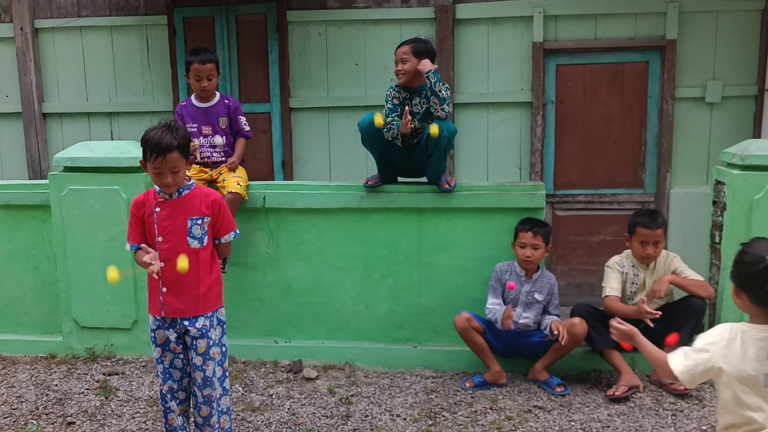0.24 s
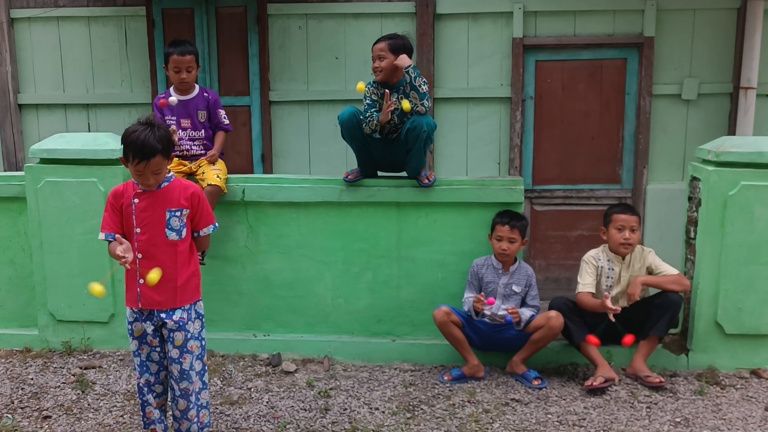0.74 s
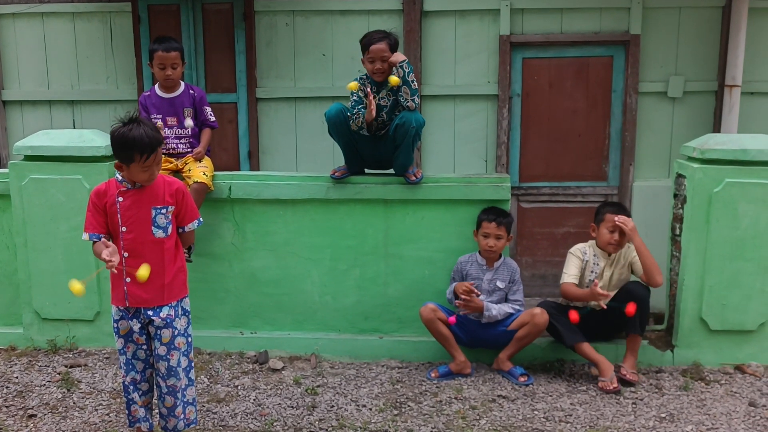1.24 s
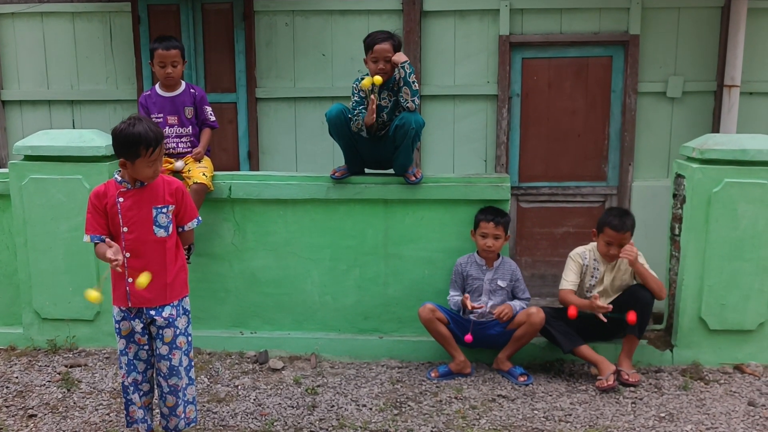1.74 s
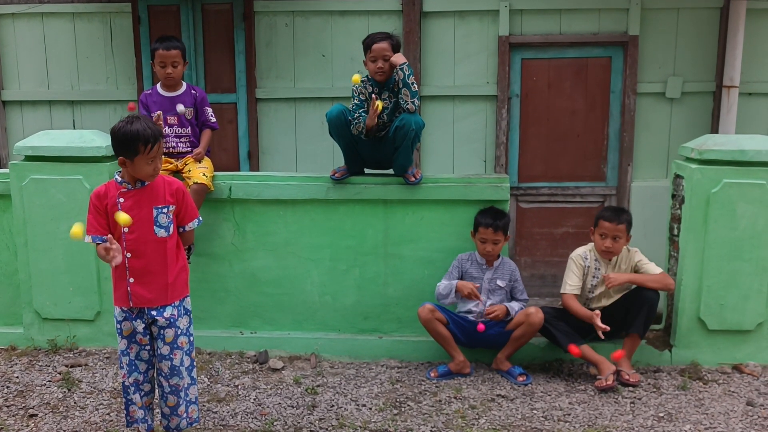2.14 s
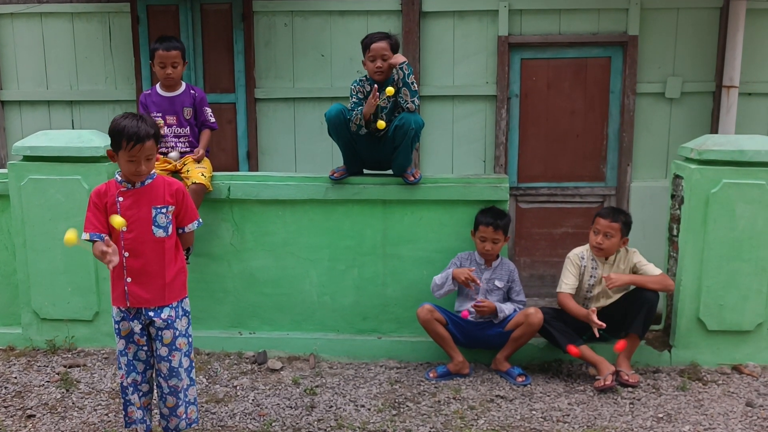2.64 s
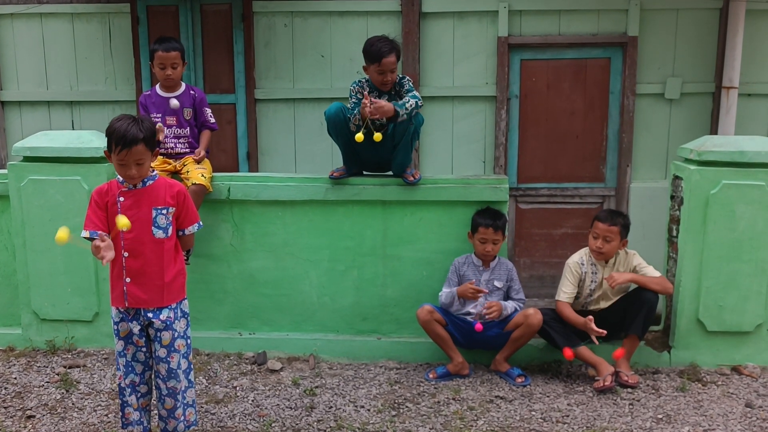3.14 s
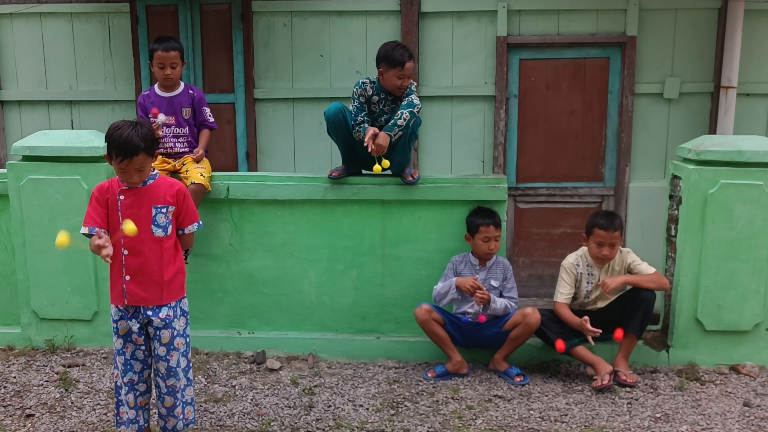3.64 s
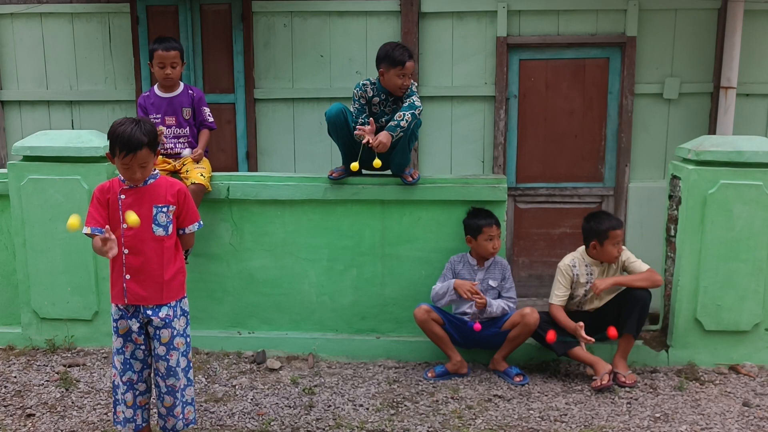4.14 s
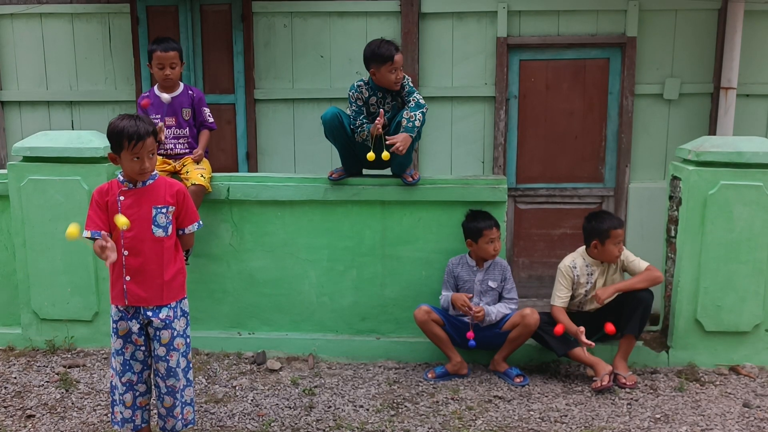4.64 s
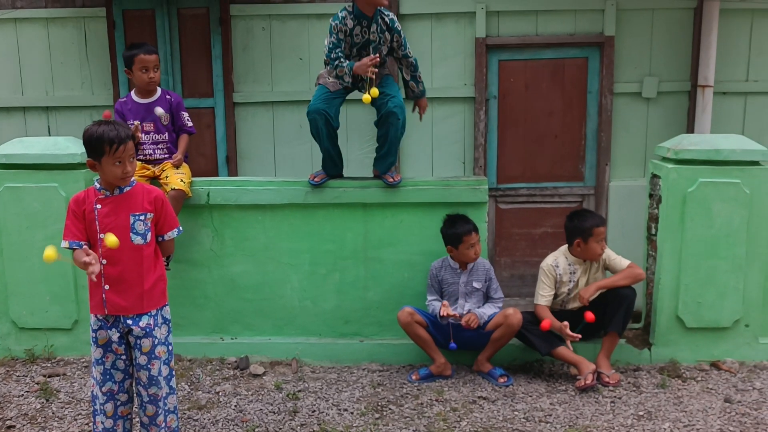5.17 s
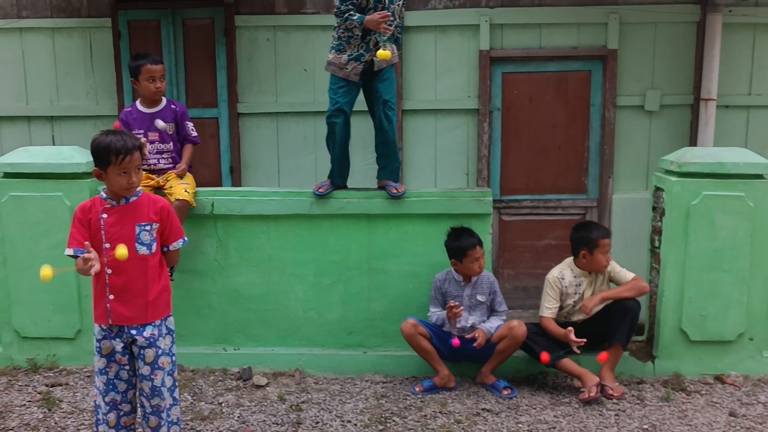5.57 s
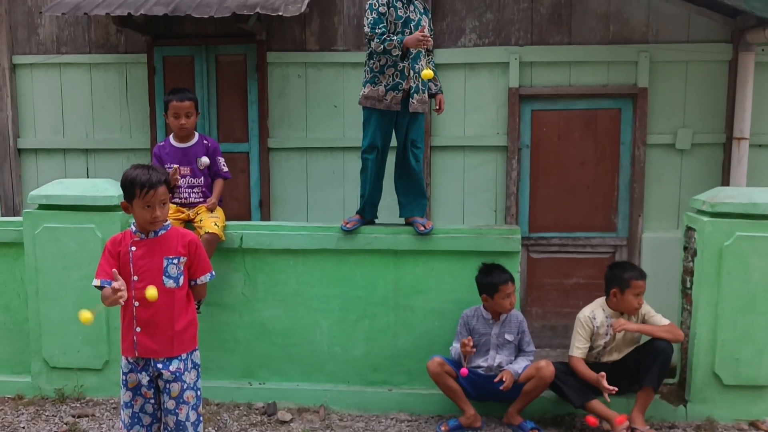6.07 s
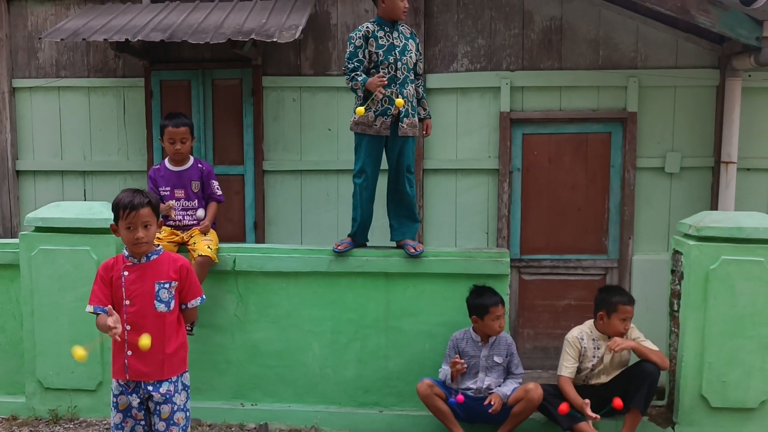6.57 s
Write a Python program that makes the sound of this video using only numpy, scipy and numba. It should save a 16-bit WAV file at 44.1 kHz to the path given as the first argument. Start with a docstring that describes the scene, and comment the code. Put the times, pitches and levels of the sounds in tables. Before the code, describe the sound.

Dense, sharp clacking from many clacker toys echoes off a nearby wall over a blurred hissy wash and bursts of rumbling wind.

```python
"""Several clacker toys (hard plastic balls on strings) knock fast before a wall: ringing tone pairs with noise bursts.
From the start each knock comes back in discrete echoes and diffuse tails; many farther toys blur into a noise hiss
that sags until about 3.6 s and then partly returns. A low wavering tone hums until 2.45 s. Noise and a wavering
tone make gusts that buffet the microphone throughout, the strongest near 5.5 s, over a thin treble hiss.
All along, gain control ducks after the loudest sounds and a soft clip rounds what slips past."""
import sys
import numpy as np
from scipy import signal
from scipy.fft import rfft, irfft, next_fast_len
from scipy.io import wavfile
from scipy.ndimage import map_coordinates
from numba import njit

SR = 44100
rng = np.random.default_rng(int(sys.argv[2]) if len(sys.argv) > 2 else 0)


def log_audio(samples):
    """Write samples as a 16-bit WAV file to the path given in sys.argv[1]."""
    # one column per channel
    frames = np.atleast_2d(samples).T
    # limit to full scale, then quantise
    limited = np.clip(frames, -1, 1)
    pcm = np.round(limited * 32767).astype(np.int16)
    wavfile.write(sys.argv[1], SR, pcm)


N = 300180


def amp(db):
    """Amplitude factor of a level in dB."""
    return 10 ** (np.asarray(db) / 20)


def unit(x):
    """x scaled to an RMS of 1."""
    return x / np.sqrt(np.mean(x ** 2) + 1e-20)


def along(points, hz):
    """(Hz, value) points read on a log frequency axis."""
    point_hz, value = np.transpose(points)
    return np.interp(np.log(hz + 1), np.log(point_hz + 1), value)


def curves(rows):
    """One value per sample for each column after the time."""
    time_s, *columns = np.transpose(rows)
    return [np.interp(np.arange(N) / SR, time_s, c) for c in columns]


def wobble(knots_per_s):
    """A smooth random curve for each port, through normally distributed knots."""
    grid_s = np.arange(0, N / SR + .01, .002)
    knots = rng.standard_normal((2, N // 100))
    smooth = [map_coordinates(k, [grid_s * knots_per_s]) for k in knots]
    return np.array([np.interp(np.arange(N) / SR, grid_s, c) for c in smooth])


def filtered(x, response):
    """x times a response of frequency."""
    size = next_fast_len(N + SR // 2)
    hz = np.fft.rfftfreq(size, 1 / SR)
    return irfft(rfft(x, size) * response(hz), size)[..., :N]


def coloured(x, spectrum):
    """x shaped by a spectrum of (Hz, dB) points."""
    return filtered(x, lambda hz: amp(along(spectrum, hz)))


def pulse(spectrum, size=1024):
    """Minimum-phase pulse of that spectrum, peak 1, made by folding the cepstrum."""
    hz = np.fft.rfftfreq(size, 1 / SR)
    cepstrum = irfft(np.log(amp(along(spectrum, hz)) + 1e-4))
    cepstrum[1:size // 2] *= 2
    cepstrum[size // 2 + 1:] = 0
    p = irfft(np.exp(rfft(cepstrum)))
    return p[None] / np.abs(p).max()


def convolve(x, h):
    """x through the pulse h, cut to N samples."""
    return signal.oaconvolve(x, h, axes=1)[:, :N]


def lay(at, size, shapes):
    """Sum of one short shape per event at each of its arrivals."""
    index = at[:, :, None] + np.arange(shapes.shape[1])
    copies = size[:, :, None] * shapes[:, None]
    return np.bincount(index.ravel(), copies.ravel(), N + SR)[:N]


# Spectrum of the thin treble hiss. Each row: frequency in Hz, relative level in dB per Hz.
HISS_SPECTRUM = [(5000, -40), (8000, -1), (11500, 2), (12500, -14), (16000, 0)]


def hiss():
    """Noise shaped to a thin treble hiss that flickers a little."""
    noise = rng.standard_normal((2, N))
    return amp(-59 + 2.65 * wobble(18)) * unit(coloured(noise, HISS_SPECTRUM))


# Puffs and longer spells of wind on the ports.
# Each row: start of the hold in seconds, hold in seconds, buffet gain in dB, flutter gain in dB over the buffet.
GUST_ROWS = [(0.067, 0.11, -39, -15), (.175, 0.086, -42, -12), (0.34, 0.1, -36, -8), (.506, .05, -40, -6),
             (0.622, .084, -36, -6), (.71, 0.1, -36.5, -14), (0.873, .045, -29.5, -5),
             (0.975, 0.031, -31, -12), (1.028, 0.73, -33, -12), (1.223, 0.072, -22, -6),
             (1.396, 0.035, -42, -18), (1.622, .064, -33, -19), (1.83, 0.056, -37, -14),
             (1.878, 0.013, -28, 0.5), (1.98, 0.23, -32, -28), (2.01, 0.084, -33, 2.5),
             (2.257, 0.062, -42, -5), (2.39, 0.055, -29, -9), (2.444, 0.07, -25, 8.5),
             (2.585, .34, -30.5, -10), (2.596, 0.024, -19, -6.5), (2.76, 0.046, -27, -10),
             (2.823, 0.012, -20, 5), (2.879, 0.012, -20.5, 1), (3.047, 0.046, -47, -18),
             (3.436, 0.043, -22, -9), (3.473, 0.098, -26, -11), (3.598, 0.11, -33.5, -8),
             (3.767, 0.084, -29, -9.5), (3.929, 0.076, -24, -5), (4.027, 0.085, -26.5, -11.5),
             (4.15, 0.14, -38, -9), (4.327, 0.042, -30, -26), (4.413, .21, -33, -26),
             (4.457, 0.018, -19, -13.5), (4.702, 0.33, -32, -13), (4.711, 0.059, -17.5, -9),
             (4.858, 0.015, -24.5, -3), (5.089, 0.041, -27.5, -11), (5.223, 0.02, -29.5, -7.5),
             (5.3, 0.07, -31, -3.5), (5.543, 0.067, -22.5, -4), (5.277, 0.027, -18.5, -9.5),
             (5.382, 0.11, -23, -2.5), (5.459, 0.11, -13, -15.5), (5.654, 0.01, -19.5, -19),
             (6.24, 0.2, -30, -20), (6.249, 0.066, -17.5, -11), (6.296, 0.017, -18, -3.5),
             (6.377, 0.015, -17.5, -13), (6.542, 0.036, -29, -26), (6.63, 0.044, -43, -4)]
CALM_DB, SWELL_DB_PER_S, EBB_DB_PER_S = -51, 618, 1102


def gusts():
    """Gains of buffet and flutter: every gust swells, holds and ebbs; powers add, the buffet's over a calm floor."""
    t = np.arange(0, N + 128, 128) / SR
    start_s, hold_s, buffet_db, flutter_db = np.transpose(GUST_ROWS)[:, :, None]
    swell_db = SWELL_DB_PER_S * np.maximum(start_s - t, 0)
    ebb_db = EBB_DB_PER_S * np.maximum(t - start_s - hold_s, 0)
    power = amp(buffet_db - swell_db - ebb_db) ** 2
    buffet_power = power.sum(0) + amp(CALM_DB) ** 2
    flutter_power = (power * amp(flutter_db) ** 2).sum(0)
    return [np.interp(np.arange(N) / SR, t, np.sqrt(p)) for p in (buffet_power, flutter_power)]


# Spectrum of the wind's rumble. Each row: frequency in Hz, relative level in dB per Hz.
RUMBLE_SPECTRUM = [(12, -45), (25, -12), (45, -3.5), (81, -5), (107, -1.5), (250, -18), (320, -24.5),
                   (550, -120)]
# Spectrum of the wind's flutter. Each row: frequency in Hz, relative level in dB per Hz.
FLUTTER_SPECTRUM = [(88, -47), (150, 0), (204, -5), (242, -3), (800, -33), (1040, -56), (1760, -120)]
# Centre pitch of the buffeting boom, about which it wavers. Each row: time in seconds, frequency in Hz.
BOOM_PITCH = [(0.0, 132), (1.5, 118), (1.9, 145), (2.5, 140), (2.75, 110), (4.3, 100), (4.7, 135),
              (4.95, 115), (6.81, 106)]


def wind():
    """Turbulence at the ports comes in lumps, partly shared by both: a rumble, a narrow boom, a higher flutter."""
    buffet_gain, flutter_gain = gusts()
    noise = rng.standard_normal((6, N))
    lumps = amp(3 * wobble(30).mean(0) + 1.5 * wobble(40))
    rumble = unit(lumps * coloured(noise[0] + 0.63 * noise[1:3], RUMBLE_SPECTRUM))

    swing = wobble(22)  # eddies shed at a nearly even rate
    boom_hz = curves(BOOM_PITCH)[0] * np.exp(0.17 * wobble(22)[0])
    phase = 2 * np.pi * np.cumsum(boom_hz) / SR
    boom = unit((swing[0] + 0.93 * wobble(32)) * np.sin(phase) + swing[1] * np.cos(phase))

    flaps = lumps * amp(3.9 * wobble(60))
    flutter = unit(flaps * coloured(noise[3] + 0.56 * noise[4:], FLUTTER_SPECTRUM))
    buffet = buffet_gain * (amp(-3) * rumble + amp(-6.5) * boom)
    port_gain = amp([[1.5], [-.3]])
    return port_gain * (buffet + flutter_gain * flutter)


# Low hum riding on the early gusts. Each row: time in seconds, centre pitch in Hz, mean gain in dB over the buffet.
HUM_COURSE = [(0.0, 168, 0), (.75, 164.1, -2), (1.3, 155, -1), (1.6, 132, 1), (1.9, 153.8, -10),
              (2.2, 143.6, 0.5), (2.45, 139, -7)]


def hum():
    """A soft low tone, wavering in pitch and strength, follows the gusts' gain, then dies away."""
    centre_hz, db = curves(HUM_COURSE)
    phase = 2 * np.pi * np.cumsum(centre_hz * np.exp(0.049 * wobble(25.06)[0])) / SR
    fade = np.clip((HUM_COURSE[-1][0] - np.arange(N) / SR) / .1, 0, 1)  # over the last 0.1 s
    return gusts()[0] * amp(db + 2.4 * wobble(20)[0]) * fade * np.sin(phase)


def ring(hz, t60_s, rise_s):
    """A pair of balls rings briefly: two close damped tones, one for each ball, tapered to silence."""
    t = np.arange(340) / SR
    other_hz = hz * np.exp(np.clip(.11 * rng.standard_normal(len(hz)), -.2, .2))
    tones = np.sin(2 * np.pi * hz[:, None] * t) + 0.68 * np.sin(2 * np.pi * other_hz[:, None] * t)
    return tones * amp(-60 * t / t60_s) * (1 - t / t[-1]) * (1 - np.exp(-t / rise_s))


# Ground and wall returns, before random scatter. Each row: delay in seconds, gain in dB.
ECHO_PATHS = [(.0022, 3.5), (.0045, 2), (.012, 0.5)]


def arrivals(time_s, pan_db, lag_s):
    """Per port: samples and gains of the direct path and echoes, each randomly scattered in delay and level."""
    delay_s, gain_db = np.transpose([(0.00034, 0.0045)] + ECHO_PATHS)
    for side in (.5, -.5):
        scatter = rng.standard_normal((len(time_s), 2 * len(delay_s)))
        port_s = (time_s + side * lag_s)[:, None]
        when_s = port_s + delay_s * np.exp(.2 * scatter[:, ::2])
        size = amp(side * pan_db[:, None] + gain_db + 1.25 * scatter[:, 1::2])
        yield np.clip(np.round(when_s * SR).astype(int), 0, N - 1), size


# Spectrum of the blurred farther knocks. Each row: frequency in Hz, relative level in dB per Hz.
BLUR_SPECTRUM = [(180, -73), (300, -24), (713, -22.5), (1280, -19.5), (2700, -2.5), (3760, -1.5), (4670, 4),
                 (5700, -3.5), (8640, -26), (12100, -34), (16000, -49)]
# Course of the farther toys. Each row: time in seconds, gain in dB.
FAR_GAIN = [(0.0, -14), (2.35, -19.5), (2.86, -21), (3.62, -25), (5.57, -21), (6.07, -24), (6.2, -25),
            (6.81, -20)]


def far_clackers(count=450):
    """Dense knocks of uneven size and pitch at random moments, over the blur that the yard makes of them."""
    draw = rng.random((count, 5))
    shapes = ring(4000 + 1500 * draw[:, 4], 0.02, 0.00017) * amp(4.3 * draw[:, 1:2])
    paths = arrivals(draw[:, 0] * N / SR, 8 * (draw[:, 2] - .5), .001 * (draw[:, 3] - .5))
    direct = np.array([lay(at, size, shapes) for at, size in paths])
    blur = unit(coloured(rng.standard_normal((2, N)), BLUR_SPECTRUM)) * amp(0.9 * wobble(30))
    port_gain = amp(curves(FAR_GAIN)[0] + [[.7], [-.7]])
    return port_gain * (amp(-0.5) * unit(direct) + blur)


# Decay time of the diffuse answer. Each row: frequency in Hz, t60 in seconds.
YARD_DECAY = [(500, 0.094), (4500, 0.17), (9000, 0.11), (14000, 0.017)]


def yard(x):
    """Diffuse answer of the houses: decaying noise tails, drawn anew every half second."""
    out, step = np.zeros((2, N + SR)), SR // 2
    for a in range(0, N, step):
        hz, t, z = signal.stft(rng.standard_normal((2, SR // 3)), SR, nperseg=256)
        decay = amp(-60 * t / along(YARD_DECAY, hz)[:, None])
        tail = signal.istft(z * decay, SR, nperseg=256)[1]
        tail *= np.clip(np.arange(tail.shape[1]) / SR / 0.0015, 0, 1)  # builds up over 1.5 ms
        wet = signal.fftconvolve(x[:, a:a + step], tail / np.linalg.norm(tail[0]), axes=1)
        out[:, a:a + wet.shape[1]] += wet
    return out[:, :N]


# Spectrum of the blunt push of contact. Each row: frequency in Hz, relative level in dB per Hz.
PUSH_SPECTRUM = [(300, -16.5), (700, -23.5), (1400, -14), (2800, -2.5), (3800, 0.5), (6000, -1),
                 (8000, -32), (10000, -40)]
# Spectrum of the treble burst of contact. Each row: frequency in Hz, relative level in dB per Hz.
SNAP_SPECTRUM = [(5000, -17), (7000, 3), (9000, -7.5), (11500, -13.5), (16000, -16.5)]
# Near knocks. Each row: nominal time in seconds, ring gain in dB, pitch of the first ball in Hz,
# treble gain in dB over the ring's, push gain in dB over the ring's, left minus right in dB before scatter.
NEAR_KNOCKS = [(0.0119, 12, 4850, -37, -33, 0), (0.0257, 14, 4480, -32.5, -18, 2),
               (0.0655, 9, 5400, -30, -6.5, 0), (0.0919, 10, 4800, -30, -11, 5),
               (0.0988, -2, 4530, -31, -8, 5), (0.134, 15.5, 4660, -27.5, -11.5, 0.5),
               (0.1599, 13.5, 4600, -26.5, -14, 1), (0.1831, 2, 4670, -25, -1, -2),
               (0.2063, 14, 4680, -25.5, -5, 2), (0.2487, 8, 4670, -23, -8, -1),
               (0.2833, 19, 4800, -32, -17, -0.5), (0.3225, 4.5, 4770, -19, -4.5, 3),
               (0.3399, 9, 4890, -26, -13, 3), (0.3467, 9, 5150, -25, -10, 7),
               (0.3566, 14, 4450, -25.5, -3.5, -1), (0.4009, -2, 4600, -33, -13, 3),
               (0.4184, -6, 4790, -28, -8, -3), (0.4342, 4, 4670, -21, -5, -3),
               (0.4508, 8, 4800, -29, -9, 5), (0.4713, 9.5, 4630, -26, -9, -3),
               (0.5161, -5, 4820, -37, -12, -1), (0.5573, 2.5, 4740, -22, -7, -1),
               (0.5697, -1, 4670, -27, -4, 1), (0.5802, 7, 4540, -21.5, -2.5, 2),
               (0.6139, -1.5, 5130, -21, -5, 1), (0.6752, 14, 4670, -27, -12, 1),
               (0.6862, 2, 4770, -18, -10, 4), (0.6948, -7, 4510, -27, 2, 7),
               (0.7061, 13, 4470, -28, -9, -3), (0.7309, -6, 4460, -36, -13, 3),
               (0.7518, 9, 5200, -35, -7, 0), (0.7914, 9.5, 4770, -28, -7, 4),
               (0.8121, 0, 5060, -21, -9, -1), (0.8238, 20, 4550, -30.5, -10.5, 1.5),
               (0.8706, -9, 4820, -34, -6, 0), (0.8793, -1, 4460, -32, -8, 2),
               (0.898, 17.5, 4480, -32.5, -11.5, 2), (0.9327, 14, 4650, -30, -14, 0),
               (0.9405, -6, 4980, -30, -7, 8), (0.95, 11.5, 4570, -30, -9, 3),
               (0.9687, -4, 4550, -34, -9, 7), (0.9979, -3, 4450, -29, -13, 4),
               (1.0093, -5, 4750, -30, -4, -10), (1.0175, 12, 4800, -29.5, -10.5, 1.5),
               (1.0348, 7, 4870, -30, -8, 2), (1.0409, 4, 4460, -34, -5, -3),
               (1.0498, -3, 4700, -34, -4, -9), (1.0668, 17.5, 4580, -30.5, -11, -4.5),
               (1.0959, -13, 4550, -34, -11, -3), (1.1135, -6, 4550, -34, -15, -1),
               (1.1302, 15.5, 4530, -32, -10.5, 2), (1.1783, 4.5, 4950, -21.5, -16, 2),
               (1.1866, -2, 5030, -22, 0, -3), (1.1932, 3.5, 4560, -26, -9, 10),
               (1.2532, 9.5, 4370, -31, -7.5, 0), (1.304, 4.5, 4900, -22, -6.5, -1),
               (1.3669, 12, 4810, -27, -10, 2), (1.4289, 3, 4800, -28, -19, -3),
               (1.4384, 4, 4700, -27, -8, 0), (1.4818, 9, 4600, -31.5, -8, 0),
               (1.4921, 8, 4800, -34, -16, 5), (1.5512, -0.5, 4560, -21, -20, -4),
               (1.5681, 5, 4530, -32, -20, 0), (1.5767, -6, 4730, -35, 1, -9),
               (1.6062, 7, 5220, -21, -5, 1), (1.6444, -12, 4410, -33, -15, 1),
               (1.6795, 11, 4500, -25, -14, 2), (1.6888, -3, 5200, -26, -11, 2),
               (1.6971, 2, 4640, -32, -6, 1), (1.7071, -2, 4700, -34, 0, 7),
               (1.7338, 3.5, 4800, -27, -7, 3), (1.7636, 0, 4970, -29, -9, 0),
               (1.7855, 11.5, 4630, -25.5, -8, 3), (1.8166, 3, 4900, -37, -19, 3),
               (1.824, 0, 4850, -36, 0, 2), (1.8488, 7, 4780, -22, -15, 3),
               (1.8747, -12, 4330, -32, -12, 4), (1.9006, 4.5, 4880, -23, -5, 0),
               (1.9295, 4, 5130, -22, -11, 1), (1.9361, 0, 4700, -35, -8, 6),
               (1.9781, 0.5, 4900, -23, -6, 3), (2.0091, 6, 4850, -22, -4.5, -1),
               (2.0355, -15, 4620, -35, -15, 0), (2.0583, 5, 5280, -34, -9, 2),
               (2.0935, 3, 4600, -23.5, -5, -2), (2.1212, 8, 4380, -25, -10, 2),
               (2.1649, 5, 4850, -25.5, -15, -6), (2.1726, 0, 4630, -29, -11, 7),
               (2.2044, -2.5, 5060, -32, -1, 2), (2.2214, 10, 4790, -23, -4.5, 1),
               (2.2494, 12, 4680, -38, -23, -1), (2.2818, 11, 5100, -28.5, -14, -1),
               (2.2907, -4.5, 4850, -31, 1, 3), (2.3328, 3, 4350, -21, -2, 3),
               (2.3646, 7, 4800, -35, -17, 2), (2.3965, 11, 4820, -32, -19, 4),
               (2.4049, -1.5, 4680, -33, -2, 2), (2.4622, 3, 4500, -24, -5, -2),
               (2.5013, 4, 4750, -26, -4, -2), (2.5327, 15.5, 4700, -32, -14.5, 2),
               (2.5872, 11, 4610, -27.5, -9, 0), (2.631, -12, 4500, -23, 2, -5),
               (2.6478, 5.5, 4970, -25.5, -7.5, 1), (2.6614, -5, 5160, -29, -2, 0),
               (2.7193, 5, 4500, -27, -5.5, 0), (2.7775, -2.5, 5050, -24, -8, -2),
               (2.8022, 3, 4450, -27, -6, -3), (2.8354, 3, 4300, -24.5, -8, 2),
               (2.8928, 9.5, 4870, -28, -14.5, 1), (2.9411, 4, 4230, -40, -10, 1),
               (2.9659, 9.5, 5100, -33.5, -11.5, -2), (3.0215, 3, 5070, -28, -13, -3),
               (3.0832, 13.5, 5100, -36, -13, 2), (3.1002, -2.5, 4690, -15.5, -2, 2),
               (3.1367, 6.5, 5270, -31.5, -15, 0), (3.1852, -1.5, 4400, -38, -10, 4),
               (3.2194, 5.5, 4800, -33, -19, -2), (3.2564, -3.5, 5000, -24, -6.5, 0),
               (3.2657, -14, 4800, -25, -16, 1), (3.3108, 2, 4100, -47, -13, 1),
               (3.3427, 3.5, 5120, -20.5, -9, 2.5), (3.3822, 2.5, 4770, -24.5, -8.5, 2),
               (3.3909, -9, 4480, -33, -16, 1), (3.4063, -1, 4840, -30, -7, 2),
               (3.4302, -2.5, 4470, -35, -7, 0), (3.4794, 3, 5000, -25, -7.5, 1),
               (3.5085, -4, 4670, -24, -8, 3), (3.5581, 2.5, 5280, -33, -9.5, -3),
               (3.5881, -6, 4330, -32, -7, 4), (3.6027, 4.5, 4800, -26, -12.5, 2),
               (3.6256, 0, 5140, -29, -15, 6), (3.6341, -0.5, 4500, -37, -7, 2),
               (3.674, -5, 4600, -28, -9, -2), (3.7002, 2.5, 4930, -22, -4.5, 2),
               (3.708, -13, 4570, -36, -12, 7), (3.7371, -2, 4990, -29, -8, 1),
               (3.7574, 0.5, 4870, -31, -6.5, 0), (3.8027, -8, 4550, -46, -6, -1),
               (3.859, 5, 4900, -25.5, -12, -2), (3.8662, 0, 4630, -23.5, -8, -1),
               (3.8738, -1, 5030, -26, -6, 3), (3.8826, -2, 4590, -37, -6, 2),
               (3.8937, -5, 4500, -31, -13, 0), (3.9132, 1, 4460, -42, -9, -1),
               (3.9459, -7, 4700, -41, -12, -2), (3.9962, 0, 4900, -24.5, -9, 0),
               (4.0094, 8, 4800, -33, -12, 1), (4.0538, -1, 4130, -45, -17, 4),
               (4.0847, -11, 4400, -38, -7, -7), (4.1177, 3, 4780, -25, -7, -3),
               (4.1365, 3, 5100, -25, -10, 2), (4.1449, 1, 4880, -37, -8, 2),
               (4.181, 5, 4960, -33, -9.5, 3), (4.2169, -11, 4850, -32, -4, 2),
               (4.236, -13, 4300, -37, -8, 9), (4.2509, 4, 4800, -29.5, -9, 0),
               (4.267, -3, 4700, -28, -20, 0), (4.2746, -11, 5400, -33, 4.5, -2),
               (4.3271, 7, 4600, -33, -9, -1), (4.3729, -1.5, 4800, -21, -7, -5),
               (4.3827, 5, 4900, -33, -11, 5), (4.3909, 0, 4640, -29, -10, 4),
               (4.4239, -3, 4710, -30, -13, -1), (4.4846, -3, 5300, -19.5, -0.5, 0),
               (4.511, 8, 4800, -38, -7, 1.5), (4.5718, -17, 4380, -42, -9, -3),
               (4.621, 0, 4400, -19.5, -3, 0), (4.6262, 11, 4660, -35, -24, 1),
               (4.6408, 7, 5060, -30, -16, 3), (4.6467, -4, 4820, -32, 0, 4),
               (4.6843, -5.5, 4840, -36, -6.5, -7), (4.7663, 9.5, 5140, -36, -10.5, 0),
               (4.7749, 9, 4600, -38, -5.5, 1), (4.7906, 2, 4490, -23, -3, 0),
               (4.823, -3, 4870, -36, -3.5, 7), (4.8926, 4.5, 5100, -23, -6, -2),
               (4.9297, 2.5, 4870, -27, -3.5, -2), (4.9718, -6, 4920, -38, -13, -3),
               (5.0284, 2.5, 4840, -26.5, -14, 2), (5.0382, 6, 4740, -40, -15, 0),
               (5.0854, -2.5, 5070, -23.5, 0.5, -0.5), (5.1481, 3.5, 4960, -26, -5.5, -5),
               (5.1564, -3, 4420, -29, -3, 4), (5.163, 6.5, 4730, -24, -20, 2),
               (5.23, 3.5, 5030, -25, -4, -0.5), (5.2729, 1, 4470, -33, -11, 2),
               (5.2912, 6, 5000, -27, -9.5, 3), (5.3032, 11.5, 4970, -38, -14, 1),
               (5.3847, -2.5, 4860, -22, -2.5, -3), (5.4144, 2, 4800, -27, -9, -6),
               (5.422, -2, 4730, -34, -5, 0), (5.43, 12.5, 5200, -36, -8, 4),
               (5.4409, -1, 4700, -28, -9, 1), (5.5217, 6.5, 5400, -29, -7, -2),
               (5.5283, 5, 4600, -25, -7, 2), (5.5504, 6.5, 4810, -26, -5, -3),
               (5.5734, 14.5, 4800, -37, -12.5, 1), (5.623, 12, 4320, -36, -9.5, -1),
               (5.6733, 7, 4970, -23, -24, 0), (5.6813, 5, 4540, -37, -12, 10),
               (5.6889, 1, 4670, -39, -4, -2), (5.6971, 15.5, 4860, -33, -12, 0.5),
               (5.7488, 8.5, 4540, -26, -11, 2.5), (5.8062, 5, 4800, -29, -7, 0.5),
               (5.8408, 9, 4550, -31, -6, 1), (5.8849, 13.5, 4270, -28.5, -9.5, 3),
               (5.9303, 5, 4900, -24, -7, 1), (5.9382, -1, 4900, -31, -5.5, 14),
               (5.9716, 8.5, 4450, -28, -7.5, 0), (6.0123, 3.5, 4700, -28, -5, 0),
               (6.0488, 1.5, 4670, -35, -5.5, 0), (6.0664, 2.5, 5000, -29.5, -13, 1),
               (6.0749, -10, 4660, -36, -3, -3), (6.1109, 2, 4500, -39, -22, 4),
               (6.1212, 9, 4950, -36, -14, -1.5), (6.1435, 2, 4960, -20, -7, 3),
               (6.1492, 5, 4400, -40, -8, 6), (6.1724, 8.5, 4650, -38, -10, -1),
               (6.1893, 1.5, 4930, -23, -8, 1), (6.1977, -3, 4800, -33, -2, 2),
               (6.2183, -8, 4820, -35, -3, 5), (6.2287, 6.5, 4410, -38, -9, 0),
               (6.2605, 8, 4920, -30.5, -9.5, 1), (6.3139, -3, 4600, -22, -1, 3),
               (6.3312, 0, 4590, -38, -11, -2), (6.3439, -4.5, 4730, -37, -3.5, 0),
               (6.3758, -7, 4530, -44, -8, 5), (6.404, 7, 4600, -33, -11.5, -2),
               (6.4499, 6.5, 4670, -26, -12, 3), (6.4572, 2, 4420, -32, -5, -1),
               (6.4752, 2.5, 4530, -32, -10, 1), (6.4944, 0, 4870, -35, -9, 2),
               (6.5315, 7.5, 4730, -30, -10, -1), (6.5786, 10, 4840, -28.5, -11, -4),
               (6.5875, 5, 4520, -26.5, -14, 8), (6.6063, -4, 4530, -38, -18.5, 1),
               (6.6247, 2, 4790, -35, -8, 1), (6.6385, -5.5, 4630, -19, 2, -7),
               (6.6888, -3, 4600, -24, -3, -5), (6.703, 14, 4900, -34, -16.5, 6),
               (6.7102, 2, 4600, -32, -3, 1), (6.7376, 9, 4780, -35, -11, -2),
               (6.7861, 3, 4870, -26, -4, -3)]
BURST_PEAK_S = 0.00097  # time to the height of the noise burst
LEAD_S = .0034  # knocks set off this much before their nominal times


def clackers():
    """Each knock: a short ring at its own pitch, a blunt push and a burst of treble, then the yard's answer."""
    time_s, db, hz, snap_db, push_db, pan_db = np.transpose(NEAR_KNOCKS)
    lag_s = .0003 + .0004 * rng.standard_normal(len(time_s))  # the ports sit a hand apart
    rings = ring(hz, 0.0057, 0.0015) * amp(db)[:, None]
    t = np.arange(200) / SR
    swell = (t / BURST_PEAK_S) ** 2 * np.exp(-2 * t / BURST_PEAK_S) * 3  # soft rise and fall
    dry = []
    for at, size in arrivals(time_s - LEAD_S, pan_db, lag_s):
        burst = rng.standard_normal((len(time_s), len(t))) * swell
        snaps = burst * amp(db + snap_db)[:, None]
        pushes = np.sign(burst) * swell * amp(db + push_db)[:, None] / np.linalg.norm(swell)
        snap = convolve(lay(at, size, snaps)[None], pulse(SNAP_SPECTRUM))
        push = convolve(lay(at, size, pushes)[None], pulse(PUSH_SPECTRUM))
        dry.append(lay(at, size, rings) + snap[0] + push[0])
    dry = np.array(dry)
    return dry + amp(-6.0) * yard(dry)


def scene():
    """All layers, from the background to the near toys."""
    return hiss() + wind() + hum() + far_clackers() + clackers()


@njit
def follow(peak, top, fall, rise):
    """Gain in nepers that falls fast while the peak is over the top and climbs back slowly."""
    gain, g = np.zeros(len(peak)), 0.
    for i in range(len(peak)):
        need = min(np.log(top / (peak[i] + 1e-9)), 0.)
        g += (need - g) * (fall if need < g else rise)
        gain[i] = g
    return gain


TOP_HZ = 16000
FALL_S, RISE_S = 0.0025, 0.028


def record(dry):
    """Gain control ducks just after loud peaks and recovers; what slips past is softly clipped and band-limited."""
    gain = follow(np.abs(dry).max(0), amp(-14), 1 / (FALL_S * SR), 1 / (RISE_S * SR))
    x = dry * np.exp(gain) * amp(4)
    x = x / (1 + (x / .98) ** 4) ** (1 / 4)
    return filtered(x, lambda hz: hz < TOP_HZ)


dry = scene()
out = record(dry)
log_audio(out)
```